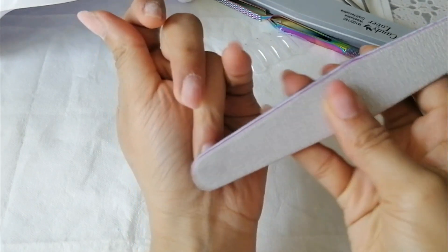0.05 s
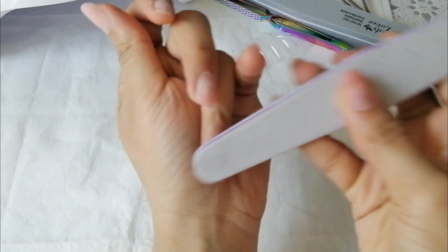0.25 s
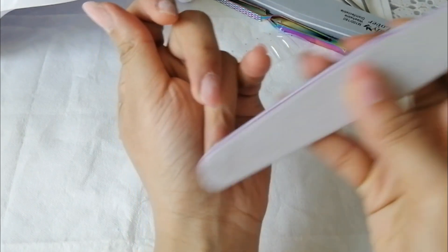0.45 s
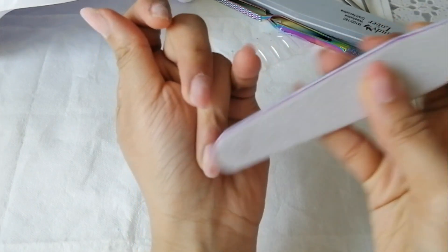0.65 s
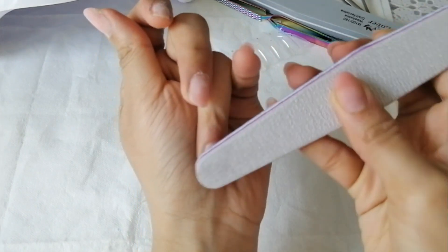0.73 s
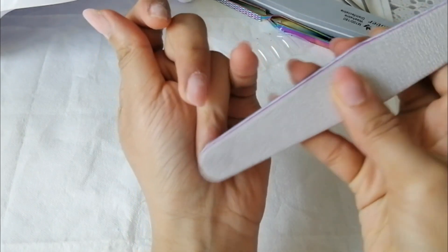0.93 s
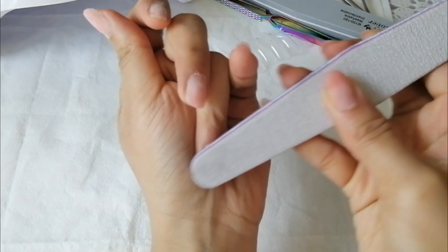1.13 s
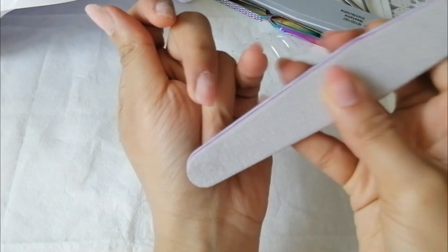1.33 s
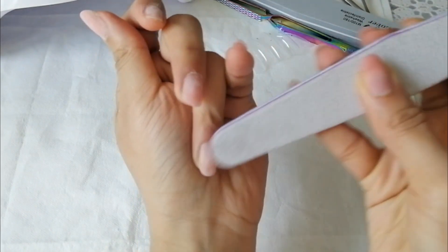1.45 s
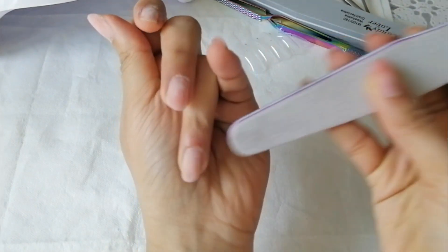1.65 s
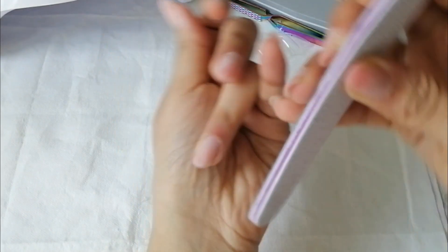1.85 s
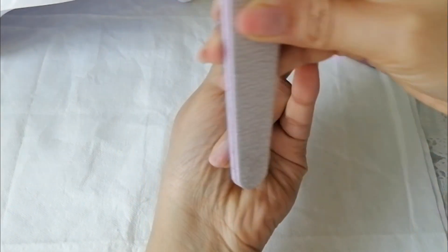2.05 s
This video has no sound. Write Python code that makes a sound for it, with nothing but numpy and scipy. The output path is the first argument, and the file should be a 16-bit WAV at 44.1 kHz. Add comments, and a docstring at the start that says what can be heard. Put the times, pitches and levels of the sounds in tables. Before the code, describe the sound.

An emery board files a fingernail in eight quick, dry strokes, with light ticks as it lands and tiny snags on the nail's edge. It is heard close up in a small, quiet room.

```python
"""A dry rasp fades out, then an emery board files a fingernail in eight quick strokes.
The board touches down with a tick, snags on the nail's edge, drags its grit across and lifts off.
The rasp is thousands of tiny clicks from the grit, heard close to a stereo microphone.
A small quiet room answers with a short echo, over a low rumble and a faint mains hum."""
import sys
import numpy as np
from scipy import signal
from scipy.fft import rfft, irfft
from scipy.io import wavfile

SR = 44100
rng = np.random.default_rng(int(sys.argv[2]) if len(sys.argv) > 2 else 0)


def inscribe(sig):
    """Save sig as 16-bit PCM at rate SR to the path in sys.argv[1].

    A 1-D sig is mono; a 2-D sig holds one channel per row.
    Samples are clipped to [-1, 1] before scaling.
    """
    pcm = np.round(np.clip(np.atleast_2d(sig).T, -1, 1) * 32767)
    wavfile.write(sys.argv[1], SR, pcm.astype(np.int16))


N = 92610
LEAD = SR // 4   # extra samples before time zero, dropped at the end
T = np.arange(-LEAD, N) / SR

# Strokes of the board; the first ends just before time zero. Event levels are before tone shaping.
# t/s, rise/s, length/s, lift-off/s, level/dB, change along the stroke/dB, gain below the top treble/dB,
# f/Hz of the resonance where the board touches, its boost/dB, left minus right/dB
STROKES = [(-0.075, 0.011, 0.057, 0.0097, -34, 1.5, -1, 7440, 2, 0),
           (0.225, 0.0034, 0.061, 0.0065, -34.5, -7, 0, 2900, 2, 0),
           (0.461, .020, 0.05, 0.008, -34, 3.5, -3.5, 7000, 2, 0),
           (0.7285, 0.005, 0.032, 0.012, -32.5, -3, -3.5, 10200, 3, 3),
           (0.936, .003, 0.038, 0.01, -33, -7.5, -2, 2350, 1, 3),
           (1.107, .020, 0.063, 0.0067, -38.5, -7, 1, 5300, 3, 1),
           (1.312, 0.011, 0.052, 0.007, -34.5, -1, -3, 8400, 3, 1),
           (1.545, 0.005, 0.044, 0.012, -31, -4, -6.5, 7000, 2, 0),
           (1.7465, 0.0026, 0.037, 0.01, -34.5, -1.5, -1, 2000, 2, 0)]
# The grit catches on the nail's edge: t/s, length/s, level/dB
SNAGS = [(0.2248, 0.007, -35), (0.4578, .003, -41), (0.466, 0.0065, -35), (0.503, .005, -33.5),
         (0.6805, 0.003, -42), (0.6863, 0.002, -33.5), (0.693, 0.0022, -42), (0.709, 0.0052, -24),
         (0.7148, 0.0046, -28), (0.727, 0.003, -27), (0.909, 0.0014, -31), (0.9244, 0.0014, -33),
         (0.937, 0.004, -31), (1.131, 0.0012, -28), (1.165, 0.0024, -33), (1.2595, 0.0043, -48),
         (1.311, .003, -40), (1.3195, .003, -36), (1.517, 0.0086, -46), (1.733, 0.0069, -46),
         (1.5432, 0.0026, -18), (1.5495, 0.005, -33), (1.748, 0.0018, -27)]
# Single coarse grains scratch the nail: t/s, level/dB
SCRATCHES = [(.2395, -33), (.2835, -36), (.4815, -24.5), (.728, -23), (.7448, -30), (.7595, -24),
             (.947, -26.5), (1.3235, -27.5), (1.3305, -46), (1.759, -49), (1.7785, -41.5)]
# The board lands on the nail: t/s, level/dB
TOUCHES = [(0.1865, -39), (0.426, -46), (0.432, -39), (0.8865, -44), (1.108, -40), (1.2695, -40),
           (1.0703, -44), (1.4888, -41), (1.718, -40)]
# A "colour" says how strong each pitch is next to the others. A squeaky snag: f/Hz, level/dB
SNAG_COLOUR = [(600, -8.5), (2000, -10), (4000, -15), (5500, -2.5), (7700, -4), (8450, 6.5), (9250, 2),
               (12000, -2), (15000, 3.5)]
# A landing, a soft tap under a thin tick: f/Hz, level/dB
TOUCH_COLOUR = [(1300, 15), (2400, 4.5), (4300, -3), (8400, 6), (15000, -11.5)]
# The filing as the left and the right microphone hear it: f/Hz, level/dB
LEFT_COLOUR = [(150, -49), (600, -14), (1000, -16.5), (1450, -27), (2050, -3.5), (2500, -4.5), (3500, -9),
               (5200, -6), (6100, -16.5), (7100, -2.5), (7950, -6.5), (8350, 2.5), (8750, -2), (9200, -3),
               (10000, -2), (11500, -6.5), (13200, -14), (14800, -10), (15600, -23.5)]
RIGHT_COLOUR = [(150, -49), (600, -14), (1400, -13), (1850, -25), (2300, -9.5), (2900, -3.5), (4200, -8.5),
                (5000, -6.5), (5400, 2.5), (5850, -5), (6500, -1), (6900, -0.5), (7250, 5), (8000, -10),
                (9000, -11.5), (11000, -7), (11900, -5), (13500, -9), (14900, -8), (15600, -14)]
# The room's bright echo: f/Hz, level/dB
ECHO_COLOUR = [(300, -24), (2500, -3.5), (4000, 5.5), (6000, 5), (7100, 9.5), (8000, 4), (11000, 4.5),
               (15000, 1)]
# Low swells as the hands shift: t/s, width/s, level/dB
HAND_SWELLS = [(.45, 0.053, -59.5), (1.036, 0.082, -53.5), (1.5, 0.019, -56), (1.7, 0.042, -61),
               (2.06, 0.13, -53.5)]
# The room's still air, mostly bass: f/Hz, level/dB
AIR_COLOUR = [(12, -2.5), (25, 0), (45, -2), (68, -6), (125, -5.5), (200, -13), (320, -10), (480, -18),
              (750, -20.5), (1100, -26.5), (1700, -32), (3000, -31.5), (3900, -38.5), (5200, -36),
              (7200, -34), (10000, -42), (13000, -42.5), (15000, -44.5)]
# Tones of the mains hum: f/Hz, level/dB
HUM_TONES = [(47.5, -68), (99.3, -67.5), (145, -74)]

GRAINS_PER_S, GRAIN_SPREAD_DB = 7000, 4
SHARED_GRIT = 0.46   # share of the grit's power that is the same on both sides
JUDDER_HZ, JUDDER_DB = 150, 1.5   # uneven pressure along a stroke


def strokes():
    """Grit drags over the nail under shaky pressure; the board's angle and contact point set the tone."""
    grains = grit() * from_db(JUDDER_DB * drift(JUDDER_HZ))
    body = signal.lfilter(*signal.butter(1, 18200, fs=SR), grains)   # all but the top treble
    total = 0
    for start, rise, length, lift, db, change_db, body_db, hz, boost_db, pan_db in STROKES:
        progress = np.clip((T - start) / length, 0, 1)
        pressure = envelope(start, rise, length, lift) * from_db(db + change_db * progress)
        balance = from_db([[pan_db / 2], [-pan_db / 2]])
        rasp = pressure * (grains + (from_db(body_db) - 1) * body) * balance
        resonance = signal.lfilter(*signal.iirpeak(hz, Q=6, fs=SR), rasp + 1e-18)
        total = total + rasp + (from_db(boost_db) - 1) * resonance
    return total


def grit():
    """Each rough grain makes one click, and bigger grains click louder."""
    shape = (3, len(T))   # both sides, left only, right only
    sizes = from_db(GRAIN_SPREAD_DB * np.minimum(rng.exponential(1, shape), 4))
    signs = rng.choice([-1, 1], shape)
    hits = rng.random(shape) < GRAINS_PER_S / SR
    clicks = rms_one(sizes * signs * hits)
    return np.sqrt(SHARED_GRIT) * clicks[0] + np.sqrt(1 - SHARED_GRIT) * clicks[1:]


def snags(squeak_hz=8460, squeak_db=-11):
    """The grit catches and tears free in bright bursts; the nail's edge squeaks while it is caught."""
    catch = sum(from_db(db) * envelope(start, 0.00012, length, 0.0004) for start, length, db in SNAGS)
    squeak = from_db(squeak_db) * catch * np.sin(2 * np.pi * squeak_hz * T + drift(JUDDER_HZ))
    return convolve(grit() * catch, colour(SNAG_COLOUR)) + squeak


def ticks(events, fade_s):
    """A scratch or a landing is a tiny burst of grit that starts at once and dies fast."""
    return grit() * sum(from_db(db) * envelope(start, 1 / SR, 0, fade_s) for start, db in events)


def board_knock(start=0.7095, hz=660, db=-45.5, t60=0.049):
    """A hard snag bends the board, which rings with one low note, falling 60 dB in t60 seconds."""
    age = np.maximum(T - start, 0)
    return from_db(db - 60 * age / t60) * np.sin(2 * np.pi * hz * age)


def echoes(sound, t60, delay_s):
    """Many small reflections blur into a dying tail, different in each ear."""
    t = np.arange(SR // 2) / SR
    tail = rng.standard_normal((2, len(t))) * from_db(-60 * t / t60) * (t > delay_s)
    return convolve(sound, tail / np.linalg.norm(tail, axis=1, keepdims=True))


def lingering_hiss(start=0.51, hz=2390, db=-68):
    """A faint, narrow band of hiss dies away after the second full stroke."""
    band = signal.lfilter(*signal.iirpeak(hz, Q=12, fs=SR), rng.standard_normal((2, len(T))))
    return from_db(db) * rms_one(band) * envelope(start, 1 / SR, 0, fade_s=0.13)


def hand_rumble(low_hz=41, high_hz=116):
    """Hands moving on the table make soft, muffled swells."""
    rumble = butter(butter(rng.standard_normal(len(T)), low_hz, "high"), high_hz, "low")
    swells = sum(from_db(db) * np.exp(-((T - peak) / width) ** 2) for peak, width, db in HAND_SWELLS)
    return rms_one(rumble) * swells


def room_air(db=-58.5, apart_hz=870):
    """The room rumbles steadily, much alike on both sides in the bass and less so higher up."""
    common, side = rng.standard_normal((2, len(T)))
    side = signal.lfilter(*signal.butter(1, apart_hz, "high", fs=SR), side)
    side += from_db(-6.5) * rng.standard_normal(len(T))
    return from_db(db) * rms_one(convolve([common + side, common - side], colour(AIR_COLOUR)))


def mains_hum(waver_hz=3.55, depth=0.75):
    """The mains hums in three low tones that waver in strength and pitch."""
    hum = 0
    for hz, db in HUM_TONES:
        waver = 1 + depth * (drift(waver_hz) + 1j * drift(waver_hz))
        hum = hum + from_db(db) * np.sqrt(2) * np.real(waver * np.exp(2j * np.pi * hz * T))
    return hum


def from_db(db):
    """Turn decibels into a number to multiply by."""
    return 10 ** (np.asarray(db) / 20)


def rms_one(x):
    """Scale a signal to an average power of one."""
    return x / np.sqrt(np.mean(x ** 2) + 1e-20)


def butter(x, hz, kind):
    """Keep the "low" or the "high" side of a frequency."""
    return signal.sosfilt(signal.butter(2, hz, kind, fs=SR, output="sos"), x)


def convolve(x, response):
    """Filter each channel, given the filter's response to one click."""
    return signal.fftconvolve(np.atleast_2d(x), np.atleast_2d(response), axes=1)[:, :len(T)]


def colour(points, size=8192):
    """Turn a colour table into a filter's response to one click, with an energy of one."""
    hz, db = np.transpose(points)
    bins = np.maximum(np.arange(size // 2 + 1) * SR / size, 1)
    gains = from_db(np.interp(np.log(bins), np.log(hz), db))
    cepstrum = irfft(np.log(gains))
    cepstrum[1:size // 2] *= 2   # fold it over so that nothing sounds before the click
    cepstrum[size // 2 + 1:] = 0
    response = irfft(np.exp(rfft(cepstrum)))
    return response / np.linalg.norm(response)


def drift(hz):
    """A smooth random wobble of about size one; higher hz moves faster."""
    pole = np.exp(-2 * np.pi * hz / SR)
    return rms_one(signal.lfilter([1], [1, -2 * pole, pole * pole], rng.standard_normal(len(T))))


def envelope(start, rise_s, length_s, fade_s):
    """Loudness over time: ramp up, hold, and fade from length_s after the start."""
    return np.clip((T - start) / rise_s, 0, 1) * np.exp(-np.maximum(T - start - length_s, 0) / fade_s)


def scene():
    """Add up the filing at the two microphones, its echoes and the background."""
    microphones = [from_db(-5.5) * colour(LEFT_COLOUR), from_db(-5) * colour(RIGHT_COLOUR)]
    touches = convolve(ticks(TOUCHES, fade_s=0.001), colour(TOUCH_COLOUR))
    rasp = strokes() + snags() + ticks(SCRATCHES, fade_s=0.0012) + touches
    filing = convolve(rasp, microphones) + board_knock()
    near_echo = from_db(-2) * echoes(filing, t60=0.062, delay_s=0)   # off the hands and table
    room_echo = from_db(-16) * convolve(echoes(filing, t60=0.32, delay_s=0.013), colour(ECHO_COLOUR))
    background = hand_rumble() + room_air() + mains_hum()
    return (filing + near_echo + room_echo + background + lingering_hiss())[:, LEAD:]


def record(dry):
    """Cut the treble steeply above 15800 Hz."""
    return signal.sosfilt(signal.ellip(10, .1, 80, 15800, fs=SR, output="sos"), dry)


dry = scene()
out = record(dry)
inscribe(out)
```